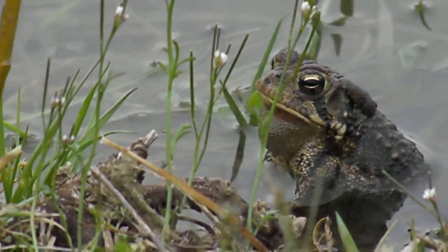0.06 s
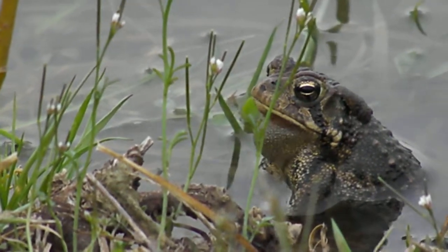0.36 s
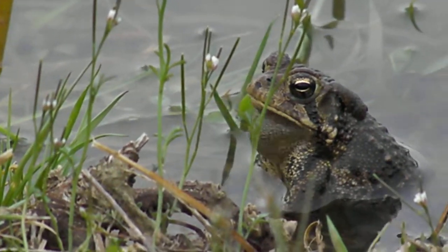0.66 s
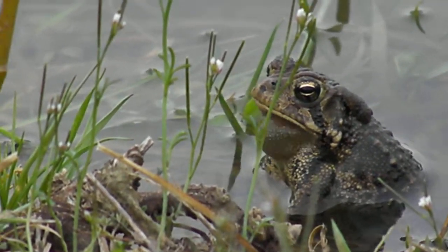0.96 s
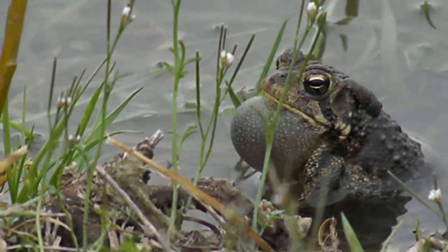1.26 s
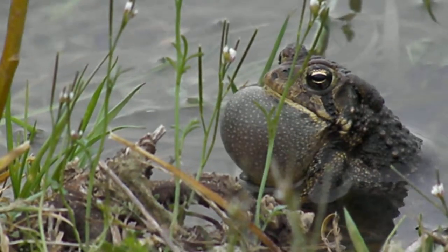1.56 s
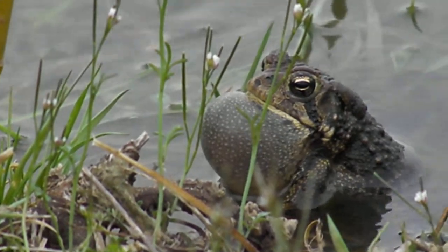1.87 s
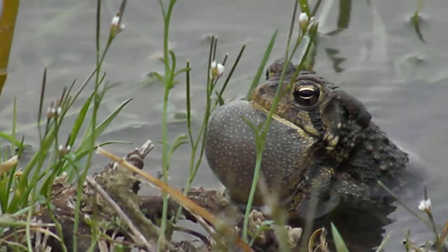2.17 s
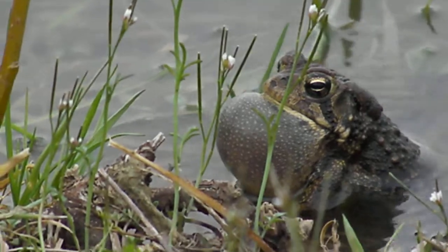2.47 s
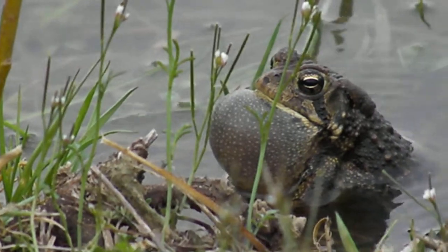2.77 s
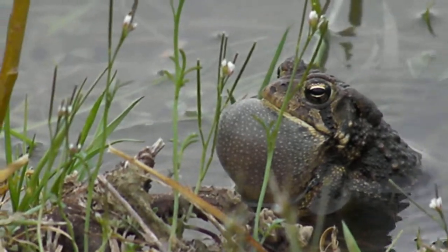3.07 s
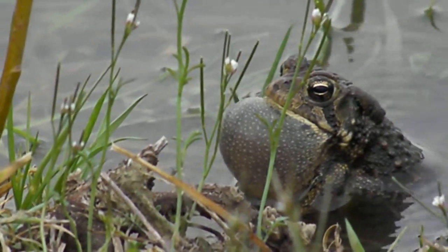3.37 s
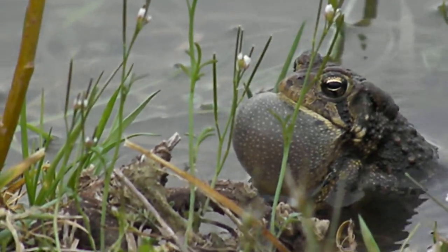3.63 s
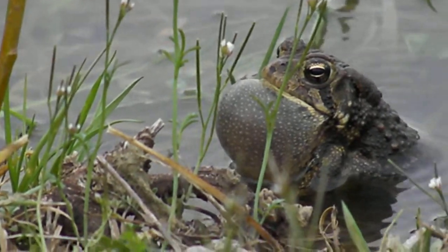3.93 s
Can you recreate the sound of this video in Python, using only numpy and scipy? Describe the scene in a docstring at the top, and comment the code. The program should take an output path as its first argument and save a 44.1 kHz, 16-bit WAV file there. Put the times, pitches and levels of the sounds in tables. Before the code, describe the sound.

A toad's high, steady trill rises at a pond, and a second, slightly higher toad joins.

```python
"""Toads trilling at a pond edge

Each trill is a fast string of tone pulses, shaped by the toad's throat and vocal sac. Over a soft hush,
two faint toads call far off and a bird chirps once. A near toad slides up into its trill, a higher one
joins it, and their pulses drift in and out of step; late on, the higher voice cracks in every pulse.
The banks echo faintly, and the recorder's gain control turns the sound down at the loudest pulses."""
import sys
import numpy as np
from scipy import signal
from scipy.fft import rfft, irfft, next_fast_len
from scipy.io import wavfile
from scipy.ndimage import uniform_filter1d, map_coordinates

SR = 44100
rng = np.random.default_rng(int(sys.argv[2]) if len(sys.argv) > 2 else 0)


def inscribe(sig):
    """Save sig as 16-bit PCM at rate SR to the path in sys.argv[1].

    A 1-D sig is mono; a 2-D sig holds one channel per row.
    Samples are clipped to [-1, 1] before scaling.
    """
    pcm = np.round(np.clip(np.atleast_2d(sig).T, -1, 1) * 32767)
    wavfile.write(sys.argv[1], SR, pcm.astype(np.int16))


N = 176400
TIME = np.arange(N) / SR


def amp(db):
    """Turn decibels into a number to multiply by."""
    return 10 ** (np.asarray(db) / 20)


def along(points, hz):
    """Read (frequency, value) rows at hz, on a log frequency scale."""
    freqs, values = np.transpose(points)
    return np.interp(np.log(hz + 1), np.log(freqs + 1), values)


def curves(rows, times):
    """Read each column after the first at the given times."""
    row_times, *columns = np.transpose(rows)
    return [np.interp(times, row_times, column) for column in columns]


def during(rows):
    """True from the first row's time to the last."""
    return (TIME >= rows[0][0]) & (TIME <= rows[-1][0])


def wobble(rate):
    """A smooth curve through `rate` random points a second."""
    return map_coordinates(rng.standard_normal(int(N * rate / SR) + 4), [TIME * rate])


def filtered(x, response):
    """Multiply each frequency in x by response(hz)."""
    size = next_fast_len(N + SR // 2)
    return irfft(rfft(x, size) * response(np.fft.rfftfreq(size, 1 / SR)), size)[:N]


def coloured(x, colour):
    """Filter x by (frequency [Hz], gain [dB]) rows."""
    return filtered(x, lambda hz: amp(along(colour, hz)))


def noise(colour):
    """Coloured noise with an average power of 1."""
    x = coloured(rng.standard_normal(N), colour)
    return x / np.sqrt(np.mean(x ** 2) + 1e-20)


def hush():
    """Soft outdoor noise that gently swells and fades."""
    # tone of the hush: (frequency [Hz], gain [dB])
    colour = [(25, -32), (60, -15.5), (125, -1.5), (250, 0), (400, -3), (700, 1), (1200, 0.5), (2000, -5),
              (3000, -13), (4500, -15.5), (7000, -19.5), (7650, -23.5), (7850, -29), (8050, -21),
              (11000, -21.5), (15500, -22.5)]
    return amp(-46.5 + 1.5 * wobble(3)) * noise(colour)


def trill(rate, voice, pulse, overtones_db, crack=None, ring=()):
    """A string of short tones, each arching in pitch, sent out by the toad's vocal sac."""
    # how the throat and sac shape the tone: (frequency [Hz], gain [dB])
    sac = [(100, -28.5), (400, -16), (900, -8.5), (1200, -6), (1450, -1.5), (1700, 3), (1900, -1),
           (2330, -8), (2480, -13), (2950, -13), (3300, -20), (3600, -12), (3900, -12), (4150, -12.5),
           (4480, -7), (4750, -9), (5050, -13), (5350, -24.5), (9000, -26), (16000, -44.5)]
    # faint rasp in every pulse: (frequency [Hz], gain [dB])
    rasp_colour = [(200, -4), (700, 2), (1500, -5), (2400, 3.5), (3000, -2), (5000, -1), (8000, -2.5),
                   (16000, -11.5)]
    # squawk thrown out by a crack: (frequency [Hz], level for one cycle slipped [dB])
    squawk_tones = [(2080, -6.5), (3850, -22.5)]
    rise_s, hold_s, fall_s, end_droop, start_droop = pulse  # droops are shares of the pitch
    jitter_s, crack_at_s, crack_s, squawk_s = .00013, .003, .00039, .0015

    live = during(rate)
    count = np.cumsum(curves(rate, TIME)[0] * live) / SR
    times = np.interp(np.arange(int(count[-1]) + 1), count[live], TIME[live])
    # from here on, each row is one pulse with its own random nudges
    nudges = rng.standard_normal((len(times), 5)).T[:, :, None]
    time_nudge, pitch_nudge, level_nudge, slip_nudge, squawk_nudge = nudges
    times = times[:, None] + jitter_s * time_nudge
    pitch, level_db, boost_db = curves(voice, times)
    start = times - (rise_s + hold_s / 2 + fall_s / 10)
    index = np.ceil(start * SR).astype(int) + np.arange(SR // 20)
    inside = (index >= 0) & (index < N)
    age = index / SR - start

    length_s = rise_s + hold_s + fall_s
    swell = np.sin(np.pi / 2 * np.clip(age / rise_s, 0, 1)) ** .85
    shape = swell * np.sin(np.pi / 2 * np.clip((length_s - age) / fall_s, 0, 1)) ** .92
    progress = np.clip(age / length_s, 0, 1)
    arch = 1 - end_droop * progress ** 4 - start_droop * (1 - progress) ** 4
    cycles = pitch * (1 + .005 * pitch_nudge) * (age[:, :1] + np.cumsum(arch, axis=1) / SR)
    squawk = 0
    if crack:  # the wave jumps ahead in mid-pulse
        slip = curves(crack, times)[0] * (1 + .32 * slip_nudge)
        cycles += slip * np.sin(np.pi / 2 * np.clip((age - crack_at_s) / crack_s, 0, 1)) ** 2
        blip = slip * amp(2.2 * squawk_nudge) * np.exp(-((age - crack_at_s) / squawk_s) ** 2)
        squawk = blip * sum(amp(db) * np.sin(2 * np.pi * hz * age) for hz, db in squawk_tones)
    tone = np.sin(2 * np.pi * cycles)
    for multiple, db in enumerate(overtones_db, start=2):
        tone += amp(db + boost_db) * np.sin(2 * np.pi * multiple * cycles)
    rasp = amp(-19 + boost_db / 2) * rng.standard_normal(age.shape)
    ringing = sum(amp(db + 1.7 * boost_db - 60 * age / fade_s) * np.sin(2 * np.pi * hz * age)
                  for hz, db, fade_s in ring)
    strength = amp(level_db + .5 * level_nudge)

    def line_up(pulses):
        return np.bincount(index[inside], (strength * pulses)[inside], N)

    source = line_up(shape * tone) + coloured(line_up(shape * rasp), rasp_colour)
    return coloured(source, sac) + line_up(swell * ringing + squawk)


def far_toads():
    """Two distant toads: one keeps trilling and grows louder, the other soon stops."""
    # trill speeds: (time [s], rate [pulses/s])
    lasting_rate = [(.012, 50.3), (.3, 47.5), (.75, 46.8), (1.05, 44.3), (4, 44)]
    fading_rate = [(.011, 40.6), (.25, 39.34), (.66, 39.8)]
    # voices: (time [s], pitch [Hz], level [dB], overtone boost [dB])
    lasting_voice = [(0, 1310, -29, -0.5), (0.151, 1450, -29, -5), (.3, 1500, -27, 0),
                     (.46, 1566, -24.5, -32), (0.698, 1633, -29, 6), (1.498, 1659, -23, 4),
                     (4, 1610, -13.5, 14)]
    fading_voice = [(0, 1606, -28, -15), (.18, 1614, -31.5, -22.5), (.4, 1585, -27, 8),
                    (.66, 1590, -42, -3.5)]
    pulse = (.0028, .0034, .0064, .1, .022)
    lasting = trill(lasting_rate, lasting_voice, pulse, overtones_db=[-15])
    return lasting + trill(fading_rate, fading_voice, pulse, overtones_db=[-15])


def bird():
    """One chirp: a harsh scratch that runs into a rough, falling whistle."""
    # the whistle: (time [s], pitch [Hz], level [dB])
    glide = [(.245, 3200, -58), (.263, 3300, -46), (.28, 3150, -44.5), (.298, 2850, -50.5),
             (.32, 2350, -62)]
    # loudness of the scratch: (time [s], level [dB])
    scratch_level = [(.205, -82), (.228, -48.5), (.265, -51), (.31, -65)]
    # tone of the scratch: (frequency [Hz], gain [dB])
    scratch_colour = [(2500, -40), (3400, -5), (4100, -3), (4500, -11), (4950, 3), (5400, -6.5),
                      (6200, -41)]
    hz, db = curves(glide, TIME)
    waver = 1 + .035 * wobble(500)
    whistle = amp(db + 1.7 * wobble(200)) * np.sin(2 * np.pi * np.cumsum(hz * waver) / SR)
    scratch = amp(curves(scratch_level, TIME)[0]) * noise(scratch_colour)
    return whistle * during(glide) + scratch * during(scratch_level)


def low_toad():
    """The first near toad slides up into its trill; its opening pulses also whistle thinly."""
    # trill speed: (time [s], rate [pulses/s])
    rate = [(.48, 45.67), (.8, 50.04), (1.1, 48.49), (1.4, 46.84), (1.9, 44.96), (2.5, 43.79), (3.1, 43.72),
            (3.5, 43.09), (4, 42.45)]
    # voice: (time [s], pitch [Hz], level [dB], overtone boost [dB])
    voice = [(.48, 1180, -25.5, 12), (.55, 1313, -17, 11.5), (.63, 1408, -10, 2.5), (.72, 1514, -9, 2.5),
             (.9, 1523, -9, 4), (1.549, 1512, -6.5, 3), (2.199, 1508, -8, 3), (2.998, 1480, -11.5, 3.5),
             (3.45, 1508, -8.5, 6), (4, 1464, -8, 2.5)]
    # thin whistle: (frequency [Hz], level before boost [dB], time to fade by 60 dB [s])
    ring = [(5016, -39.5, 0.023)]
    pulse = (.0034, .00061, .007, .23, .047)
    return trill(rate, voice, pulse, overtones_db=[-17, -28, -28.5, -35], ring=ring)


def high_toad():
    """The second near toad sings higher, and its voice cracks toward the end."""
    # trill speed: (time [s], rate [pulses/s])
    rate = [(1.468, 51.48), (1.8, 50.86), (2.1, 47.08), (2.5, 46.27), (2.9, 44.93), (3.4, 43.88),
            (3.65, 44.81), (4, 44.68)]
    # voice: (time [s], pitch [Hz], level [dB], overtone boost [dB])
    voice = [(1.47, 1240, -26.5, 9.5), (1.578, 1497, -23.5, 6.5), (1.659, 1542, -10.5, 7.5),
             (1.799, 1609, -9.5, 5), (2.102, 1634, -6, 3), (2.802, 1643, -7, 1.5),
             (3.398, 1647, -6.5, -1.5), (4, 1605, -4.5, -2.5)]
    # how far the voice slips in each pulse: (time [s], slip [cycles])
    crack = [(3.25, 0.06), (3.31, 0.16), (3.421, 0.31), (4, .25)]
    pulse = (.0034, .0032, .005, .09, .027)
    return trill(rate, voice, pulse, overtones_db=[-13.5, -39, -29, -38.5], crack=crack)


def bank_echo(x):
    """The pond's banks throw back a faint, short echo."""
    # echo length: (frequency [Hz], time to fade by 60 dB [s])
    fade = [(200, 0.12), (1500, 0.12), (5000, 0.41), (12000, 0.099)]
    hz, age, spectrum = signal.stft(rng.standard_normal(SR // 2), SR, nperseg=256)
    spectrum *= amp(-60 * age / along(fade, hz)[:, None])
    tail = signal.istft(spectrum, SR, nperseg=256)[1]
    return amp(-22.5) * signal.fftconvolve(x, tail / np.linalg.norm(tail))[:N]


def scene():
    """Four toads and a bird, with the hush and the echo."""
    calls = low_toad() + high_toad() + far_toads() + bird()
    return (calls + hush() + bank_echo(calls))[None]


def record(dry):
    """Gain control turns loud pulses down fast and recovers slowly; fine grit rides on the peaks."""
    # tone of the grit: (frequency [Hz], gain [dB])
    grit_colour = [(100, -2.5), (1000, 6), (5000, -0.5), (6400, 4.5), (7850, -4.5), (8200, 3.5), (8900, -2),
                   (9600, 2), (10400, -3.5), (11150, -0.5), (12000, -4.5), (15500, -0.5)]
    threshold_db, cut_share, recover_db_per_s, top_hz = -9.5, .75, 4.5, 15900
    x = dry[0]
    loudness = uniform_filter1d(np.abs(signal.hilbert(x)), size=220)
    over_db = np.maximum(20 * np.log10(np.abs(loudness) + 1e-6) - threshold_db, 0)
    recovery_db = recover_db_per_s * TIME
    cut_db = np.maximum.accumulate(cut_share * over_db + recovery_db) - recovery_db
    x = x * amp(-uniform_filter1d(cut_db, size=300))
    grit = amp(-29.5) * np.abs(signal.hilbert(x)) ** 2.54 * noise(grit_colour)
    return filtered(x + grit, lambda hz: hz < top_hz)[None]


dry = scene()
out = record(dry)
inscribe(out)
```